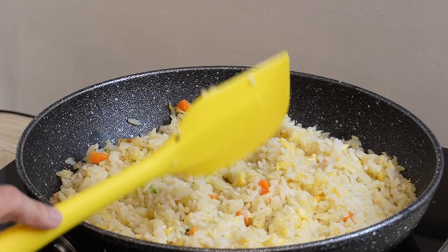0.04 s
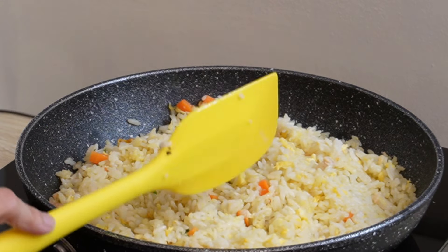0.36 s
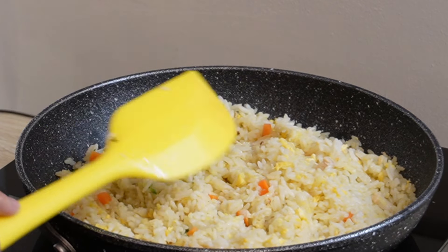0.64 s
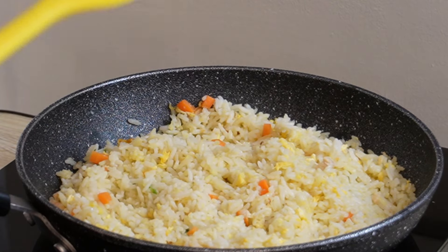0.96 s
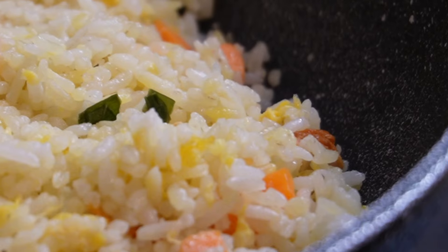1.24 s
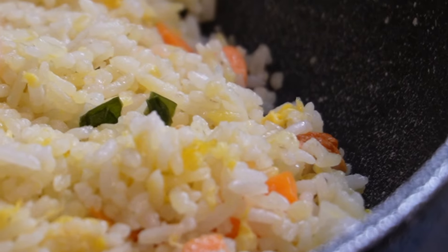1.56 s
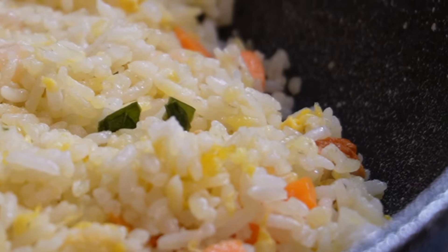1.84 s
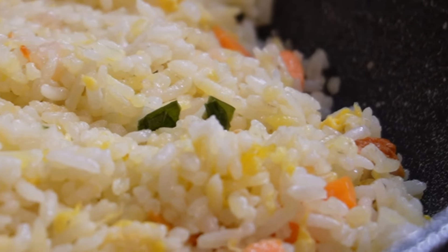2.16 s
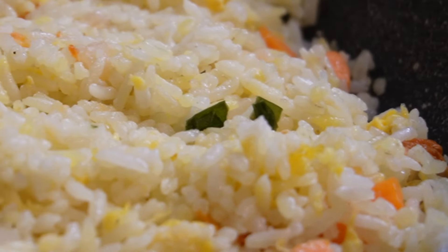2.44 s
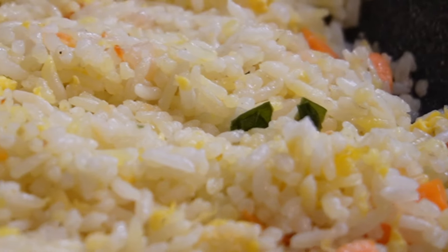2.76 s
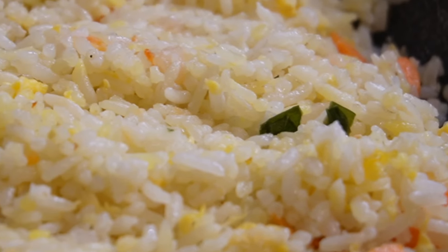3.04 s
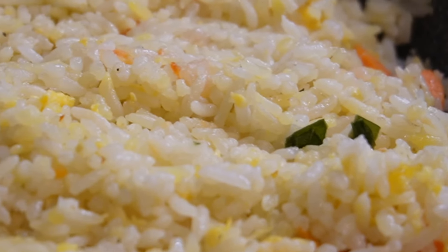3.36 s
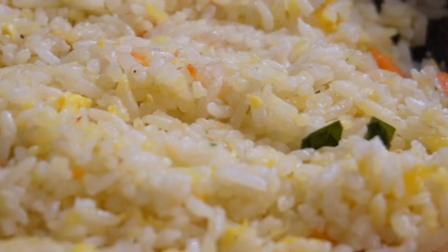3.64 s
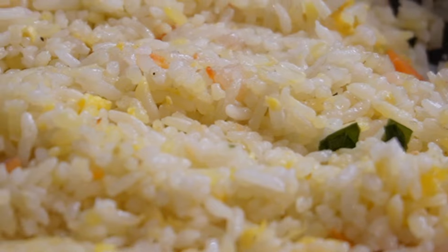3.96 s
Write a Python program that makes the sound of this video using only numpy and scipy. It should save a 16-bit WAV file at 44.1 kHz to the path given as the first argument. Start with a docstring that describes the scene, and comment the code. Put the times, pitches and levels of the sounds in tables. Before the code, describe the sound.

A spatula pats fried rice in a pan four times, then faint oil pops follow.

```python
"""Four close pats of a silicone spatula on fried rice: each impact rings the pan's modes dully in a small
kitchen, while steam and bursting bubbles sizzle. Then the scene changes: the pan sits untouched. The hob's
cooling fan rushes and hums, its coil whines faintly, and single pops of oil snap out of the rice, each an
impulse that rings the pan wall and echoes in the room."""
import sys
import numpy as np
from scipy import signal
from scipy.fft import rfft, irfft
from scipy.io import wavfile
from scipy.ndimage import uniform_filter1d

SR = 44100
rng = np.random.default_rng(int(sys.argv[2]) if len(sys.argv) > 2 else 0)


def wrap_up_sound(samples):
    """Save the sound to the file named by the first command line argument, as 16-bit audio."""
    columns = np.atleast_2d(samples).T
    # keep every value between -1 and 1, then stretch to whole-number steps
    tamed = np.clip(columns, -1, 1)
    steps = np.round(tamed * 32767).astype(np.int16)
    wavfile.write(sys.argv[1], SR, steps)


N = 176400
TIME = np.arange(N) / SR

# Spectrum of steam and bubbles. Each row: frequency in Hz, spectral level in dB.
SIZZLE_SPECTRUM = [(30, -46), (200, -23), (700, -8), (1500, 0), (3800, 6.5), (6500, 4), (9000, -1),
                   (11000, -2), (14000, -6.5), (18000, -16)]


def pat(level_db, tilt_db, thump_db, contact_db, crack_db):
    """Impact excitation: a brief contact sets the pan's damped modes and the room ringing."""
    # Spectra of the blow and of the blade's crack. Each row: frequency in Hz, level in dB.
    blow_spectrum = [(30, -58), (70, -14), (120, -1), (200, -16.5), (300, -3.5), (360, -11.5), (440, -3.5),
                     (640, -19.5), (820, -2), (1000, 0), (1320, 3.5), (1650, -0.5), (2300, 2), (2750, -1),
                     (3300, 0.5), (4200, -0.5), (5200, -10), (8000, -16), (16000, -42)]
    crack_spectrum = [(100, -31), (1000, -18), (2500, -2), (3800, -5), (5400, -1), (6500, -22),
                      (16000, -25)]
    # Dense ring of pan and room. Each row: frequency in Hz, 60 dB decay time in seconds.
    ring_decay = [(100, 0.53), (500, 0.99), (1400, 0.46), (3500, 0.5), (10000, 0.23)]
    # Modes of the pan on the hob. Each row: frequency in Hz, level in dB, 60 dB decay time in seconds.
    pan_modes = [(113, -19.5, .42), (135.6, -18.5, .58), (168, -24, .55), (252, -22, .4), (281, -17.5, .38),
                 (308, -16, .34), (428, -12, .46), (452, -15.5, .42), (781, -5.5, .18), (813, -6, .2),
                 (1040, -9.5, .16), (1127, -9, .3), (1256, -6.5, .3), (1306, -1.5, .26), (1342, 3, .12),
                 (1392, -4, .16), (1855, -10, .3), (2072, -12, .27), (2314, -10, .33), (2515, -9, .26)]
    contact_s, crack_s, bass_rise_s, settle_s = 0.0052, 0.0055, 0.0028, 0.027
    ring = reverberation(ring_decay)
    t = np.arange(ring.shape[1]) / SR
    crunch, edge = rng.choice([-1., 1.], (2, len(t)))
    contact = amp(-25.5 + contact_db) * crunch * np.exp(-t / contact_s)
    crack = amp(-29.5 + crack_db) * colour(edge * np.exp(-t / crack_s), crack_spectrum)
    blow = colour(contact + amp(-33) * ring, tilted(blow_spectrum, tilt_db)) + crack
    for hz, db, t60 in pan_modes:
        mid, side = np.sin(2 * np.pi * (hz * t + rng.random((2, 1))))
        swing = amp(-33.5 + db) * 1000 ** (-t / t60)
        if hz < 600:  # the low modes carry the thump
            swing *= amp(thump_db) * (1 - np.exp(-t / bass_rise_s))
            swing += amp(-4.5) * np.interp(t - settle_s, t, swing)  # the pan rocks back on the hob
        blow += swing * (mid + amp(-20.5) * np.array([side, -side]))
    return amp(level_db) * blow


def spatula():
    """Superposition: each of four pats adds to the ring left by those before it."""
    # Each row: start in seconds, level in dB, treble tilt in dB per octave,
    # then the gains of thump, contact and crack in dB.
    blows = [(0.0151, -0.26, -2, -2.5, -.5, -8), (0.2089, -1.5, -2.5, -0.5, 0, -1.5),
             (0.3691, -0.1, -2, -0.5, -3, 1.5), (0.5522, -3, -8, 3.5, -2.5, -14)]
    out = np.zeros((2, N))
    for start, *blow in blows:
        add(out, start, pat(*blow))
    return out


def wall_ring(t):
    """Modal response: where a pop lands, here by chance, sets how strongly each wall mode rings."""
    # Each row: frequency in Hz, level in dB, 60 dB decay time in seconds.
    wall_modes = [(3260, -4, .14), (3520, -4, .14), (3850, -2, .2), (4130, 0, .2), (4300, 0, .24),
                  (4560, -3, .12), (5150, -3, .1), (5600, -5, .08)]
    detune = 1 + 0.006 * rng.uniform(-1, 1)
    ring = np.zeros(len(t))
    for hz, db, t60 in wall_modes:
        swing = rng.standard_normal() * amp(db) * 1000 ** (-t / t60)
        ring += swing * np.sin(2 * np.pi * (hz * detune * t + rng.random()))
    return ring


def oil_pops():
    """Impulse response: each sharp click rings the pan wall and is reflected by it and the kitchen."""
    # Each row: start in seconds, level in dB, ring and room gain in dB, treble tilt in dB per octave.
    pops = [(1.212, -31, -11, -2), (1.2569, -25, -5, -2.5), (1.2595, -23, -8, -1), (1.2613, -23.5, -5, -7),
            (1.264, -29, -3, -1), (1.769, -33, -6, 4), (2.5093, -18, -9, -1), (2.5138, -27, -8, 2),
            (2.5184, -22, -12, 0), (2.5271, -16, -4, .5), (2.5308, -26, -4, 0), (2.918, -27.5, -4, -2.5),
            (3.1455, -22.5, -6, -3), (3.2095, -29.5, -6, 1), (3.3241, -21.5, -2.5, -1),
            (3.3246, -17, -5.5, -0.5), (3.3283, -26, -2, -2), (3.398, -31, -3, -10),
            (3.5808, -23.5, -5.5, -3.5), (3.916, -35, 3, 1)]
    # Spectrum of a pop. Each row: frequency in Hz, level in dB.
    pop_spectrum = [(60, -47), (300, -31), (1000, -5.5), (2300, -2.5), (3400, 2.5), (4200, 2.5),
                    (5600, 3.5), (7500, -1.5), (10000, -2.5), (12000, -8.5), (16000, -11), (18000, -22)]
    # Kitchen reverberation. Each row: frequency in Hz, 60 dB decay time in seconds.
    room_decay = [(300, 0.39), (4000, 0.45), (8000, 0.41), (16000, 0.3)]
    early_decay_s, bounce_s = 0.0057, 0.0031
    out = np.zeros((2, N))
    peak = abs(impulse(pop_spectrum)).max()
    for start, db, room_db, tilt_db in pops:
        room = reverberation(room_decay)
        t = np.arange(room.shape[1]) / SR
        direct = t == 0
        scatter = rng.standard_normal(len(t)) * rng.standard_normal(len(t))
        early = scatter * np.exp(-t / early_decay_s) * (t > 0.0005)
        echoes = amp(3 + room_db) * room / np.linalg.norm(room[0])
        echoes += amp(-5.5) * early / np.linalg.norm(early)
        echoes[:, round(bounce_s * SR)] += amp(-8.5)  # off the far wall of the pan
        click = colour(direct + echoes, tilted(pop_spectrum, tilt_db)) / peak
        add(out, start, amp(db) * (click + amp(-26 + room_db) * wall_ring(t)))
    return out


def sizzle():
    """Shot noise of tiny bursting bubbles joins the hiss of steam; both swell as the rice is pressed."""
    # Each row: time in seconds, level in dB.
    swells = [(0.0, -49), (0.022, -49), (0.118, -54), (0.222, -45.5), (0.336, -48.5), (0.352, -46),
              (0.43, -52.5), (0.47, -42.5), (0.528, -49), (0.588, -49), (0.794, -53.5), (0.84, -47),
              (0.875, -51.5), (0.925, -49), (0.984, -53.5), (1.0, -50), (1.07, -51.5), (1.13, -51),
              (1.16, -57.5)]
    bursts_per_s, clump_s = 1100, 0.008
    sizes = amp(2.5 * np.minimum(rng.exponential(1, (2, N)), 3)) * rng.choice([-1, 1], (2, N))
    bursts = sizes * (rng.random((2, N)) < bursts_per_s / SR)
    clumps = amp(2.5 * unit(uniform_filter1d(rng.standard_normal(N), int(clump_s * SR))))
    crackle = unit(colour(spread(bursts * clumps), tilted(SIZZLE_SPECTRUM, db_per_octave=-0.2)))
    steam = noise(SIZZLE_SPECTRUM)
    return envelope(swells) * (amp(3.5) * steam + amp(0.5) * crackle)


def wet_snaps():
    """Pressure pulses: single larger bubbles burst as the pressed rice lets go."""
    # Each row: start in seconds, peak level in dB.
    bubbles = [(.3445, -36), (0.4586, -29), (0.4762, -29), (.8312, -32), (0.906, -33), (.998, -35)]
    out = np.zeros((2, N))
    click = impulse(SIZZLE_SPECTRUM)
    for start, db in bubbles:
        add(out, start, amp(db) * click / abs(click).max())
    return out


def hob():
    """Resonances colour the fan's rush; close tones beat in its hum, over a drone and the coil's whine."""
    # Spectrum of the rush. Each row: frequency in Hz, spectral level in dB.
    fan_spectrum = [(25, -26), (48, -25), (75, -8.5), (135, -13), (200, -12), (270, -7.5), (330, -7.5),
                    (450, -0.5), (600, -3), (800, -1.5), (1050, 2), (1350, -1.5), (1700, -.5), (2300, -.5),
                    (2900, -4.5), (4000, -6), (6000, -13), (9000, -18), (12000, -16.5), (14500, -23.5),
                    (15800, -12), (16600, -37), (18000, -26)]
    # Resonances of the housing. Each row: frequency in Hz, width in Hz, lift in dB.
    housing = [(452, 30, 6), (510, 24, 3), (1128, 40, 3.5), (1445, 28, 4), (1540, 36, 3), (1668, 38, 5),
               (1850, 30, 2.5), (2140, 70, 4), (2310, 40, 2), (2425, 70, 4), (2630, 40, 2.5),
               (4200, 60, 3.5)]
    # Steady tones. Each row: frequency in Hz, level in dB, line width in Hz.
    hum_tones = [(255.4, -61.2, 1.5), (260.6, -69, 1.5), (765.5, -59.8, 5), (876, -61.3, 3), (1022, -61, 4),
                 (1750, -63.5, 6)]
    # Drone and whine come and go. Each row: time in seconds, level in dB.
    drone_levels = [(1.2, -78), (1.45, -69), (1.62, -74), (1.93, -66.5), (2.3, -79), (3.1, -84),
                    (3.48, -69), (3.8, -86)]
    whine_levels = [(1.3, -85), (1.8, -69), (2.3, -73), (2.9, -66), (3.4, -67), (4, -73)]
    coil_hz = 15872
    hum = sum(amp(db) * tone(hz, width_hz) for hz, db, width_hz in hum_tones)
    drone = tone(hz=134.6, width_hz=2) * envelope(drone_levels)
    whine = tone(coil_hz, width_hz=15) + amp(-3) * tone(coil_hz, width_hz=296)
    rush = amp(-46.5) * noise(fan_spectrum, housing)
    return rush + hum + drone + whine * envelope(whine_levels)


def kitchen():
    """Ambient noise: the room's quiet, steady diffuse field."""
    # Each row: frequency in Hz, spectral level in dB.
    ambient_spectrum = [(25, -26), (45, -21), (70, -8), (100, -20), (140, -4.5), (200, -8.5), (290, -0.5),
                        (360, -6), (445, 5.5), (580, -5), (850, 1.5), (2000, 1), (5000, -13.5),
                        (16000, -13.5)]
    return amp(-50.5) * noise(ambient_spectrum)


def reverberation(decays, size=24000):
    """Exponential decay of dense echoes, each band at its own rate."""
    hz, t, bands = signal.stft(spread(rng.standard_normal((2, size))), SR, nperseg=256)
    decay = amp(-60 * t / read(decays, hz)[:, None])
    return signal.istft(bands * decay, SR, nperseg=256)[1][:, :size]


def spread(pair):
    """Partial coherence: two unrelated sounds become the mid and side of a diffuse field."""
    # Each row: frequency in Hz, side gain in dB.
    side_gains = [(25, -8), (70, -15), (200, -6), (400, -16), (650, -27), (1200, -40), (2400, -30),
                  (3400, -19), (4600, -7.5), (8000, -2), (10000, -3), (10600, -29), (16000, -21)]
    size = pair.shape[1]
    side = irfft(rfft(pair[1]) * amp(read(side_gains, np.fft.rfftfreq(size, 1 / SR))), size)
    return np.array([pair[0] + side, pair[0] - side])


def noise(spectrum, resonances=()):
    """Spectral shaping: steady diffuse noise, lifted at its resonances."""
    f = np.fft.rfftfreq(N, 1 / SR)
    lift = sum(db / (1 + (2 * (f - hz) / width) ** 4) for hz, width, db in resonances)
    white = rfft(rng.standard_normal((2, N)))
    return unit(spread(irfft(white * amp(read(spectrum, f) + lift), N)))


def tone(hz, width_hz):
    """Phase diffusion: a random walk widens the spectral line of a sine of rms 1."""
    walk = np.cumsum(rng.standard_normal(N)) * np.sqrt(2 * np.pi * width_hz / SR)
    drift = uniform_filter1d(walk, max(int(SR / width_hz / 10), 1))
    return np.sqrt(2) * np.sin(2 * np.pi * hz * TIME + drift)


def impulse(spectrum, size=4096):
    """Minimum phase: the causal click of energy 1 with the given spectrum."""
    log_gain = np.log(amp(read(spectrum, abs(np.fft.fftfreq(size, 1 / SR)))))
    click = np.fft.ifft(np.exp(signal.hilbert(log_gain).conj())).real[:size // 2]
    return click / np.linalg.norm(click)


def colour(x, spectrum):
    """Convolution imposes a spectrum on a sound."""
    return signal.oaconvolve(np.atleast_2d(x), impulse(spectrum)[None], axes=1)[:, :x.shape[-1]]


def tilted(spectrum, db_per_octave, corner_hz=2000):
    """Spectral tilt brightens or dulls the treble."""
    return [(hz, db + db_per_octave * np.log2(max(hz / corner_hz, 1))) for hz, db in spectrum]


def read(points, hz):
    """Interpolation on a log-frequency axis."""
    f, value = np.transpose(points)
    return np.interp(np.log(hz + 1), np.log(f + 1), value)


def envelope(levels):
    """Gain over time, interpolated in decibels."""
    return amp(np.interp(TIME, *np.transpose(levels)))


def amp(db):
    """Decibels to amplitude ratio."""
    return 10 ** (np.asarray(db) / 20)


def unit(x):
    """Normalisation to rms 1."""
    return x / np.sqrt(np.mean(x ** 2) + 1e-20)


def add(mix, start_s, sound):
    """Superposition of a sound on the mix."""
    part = mix[:, max(round(start_s * SR), 0):][:, :sound.shape[-1]]
    part += sound[..., :part.shape[1]]


def scene():
    """Sources sum in two groups, played as two scenes one after the other: patting and sizzling, then the pan
    left alone."""
    stop_s, resume_s, fade_s = 1.166, 1.195, 0.0052
    patting = spatula() + sizzle() + wet_snaps() + kitchen()
    untouched = hob() + oil_pops()
    fade_in = np.clip((TIME - resume_s) / fade_s + 0.5, 0, 1)
    return patting * (TIME < stop_s) + untouched * fade_in


def record(dry):
    """Band limiting: a steep low-pass filter removes the highest treble."""
    cutoff_hz = 18100
    low_pass = signal.firwin(511, cutoff_hz, window=("kaiser", 9), fs=SR)
    return signal.oaconvolve(dry, low_pass[None], "same")


dry = scene()
out = record(dry)
wrap_up_sound(out)
```